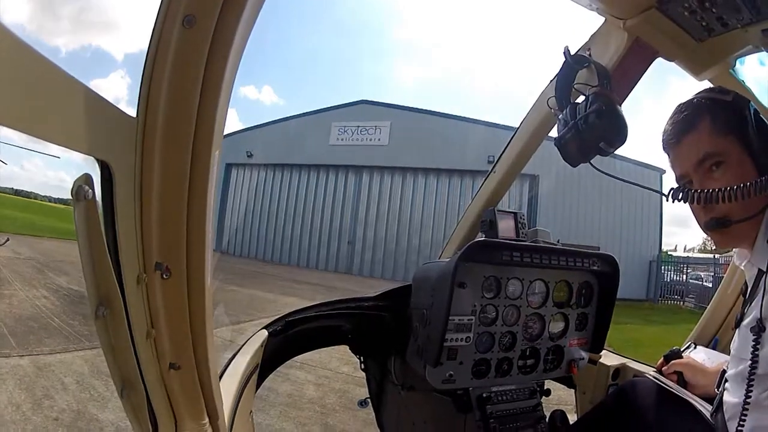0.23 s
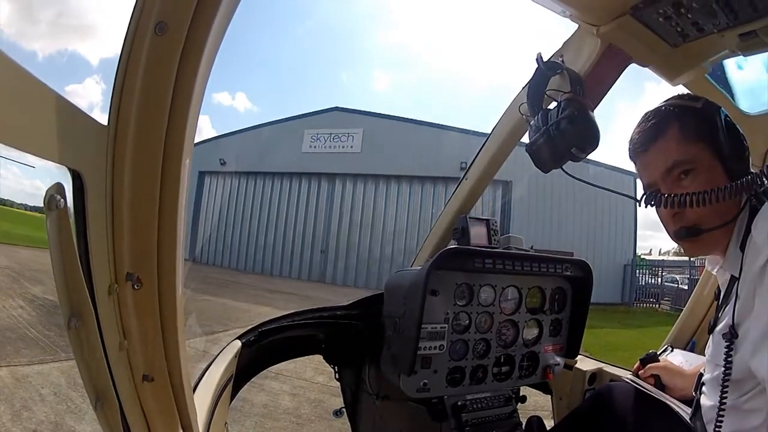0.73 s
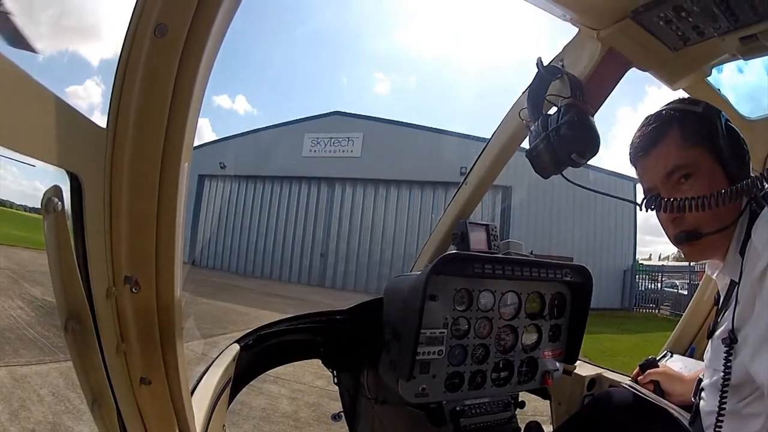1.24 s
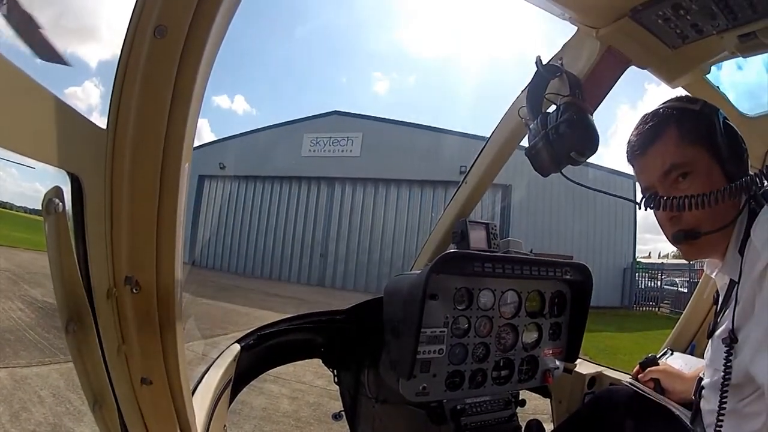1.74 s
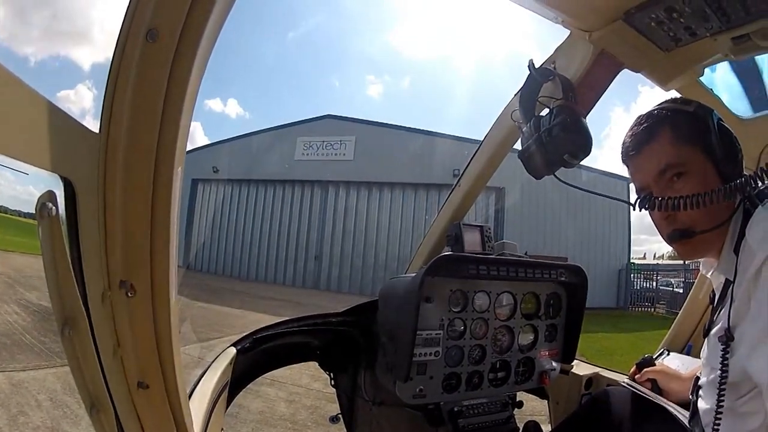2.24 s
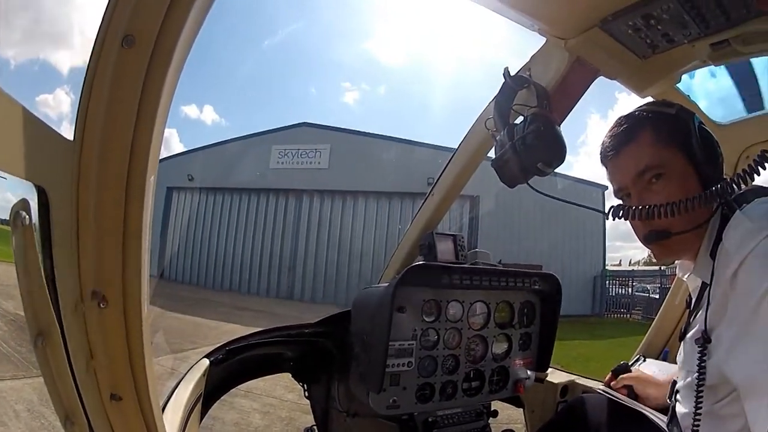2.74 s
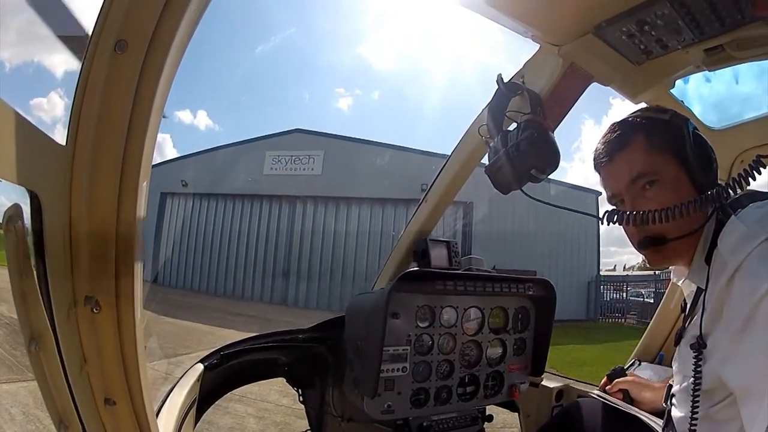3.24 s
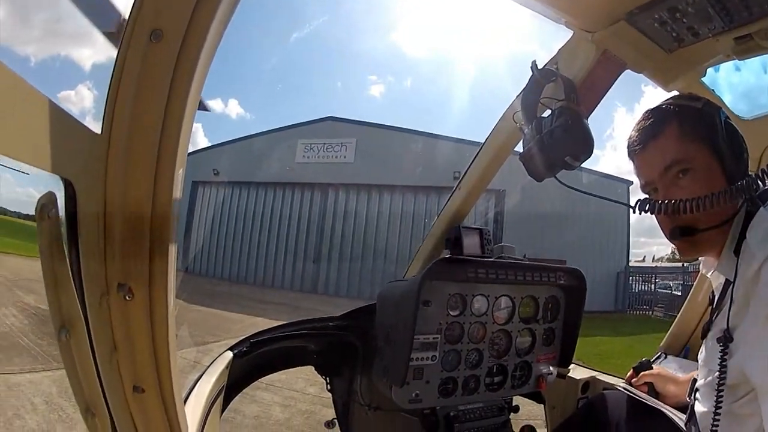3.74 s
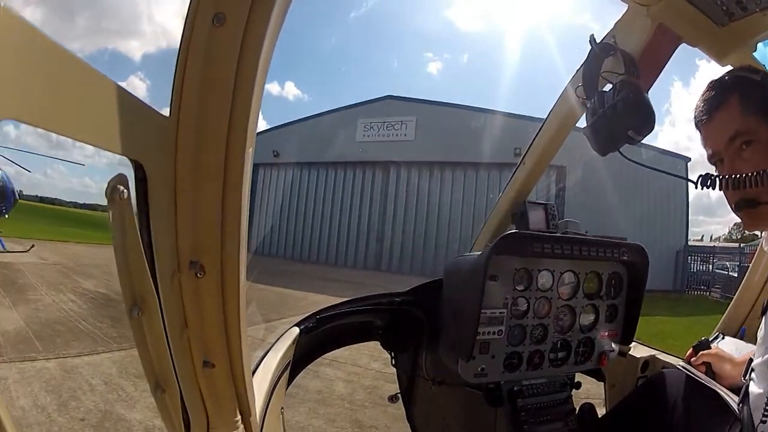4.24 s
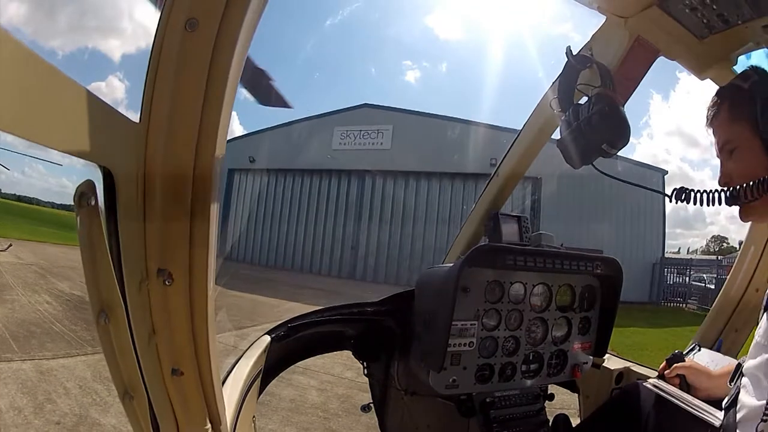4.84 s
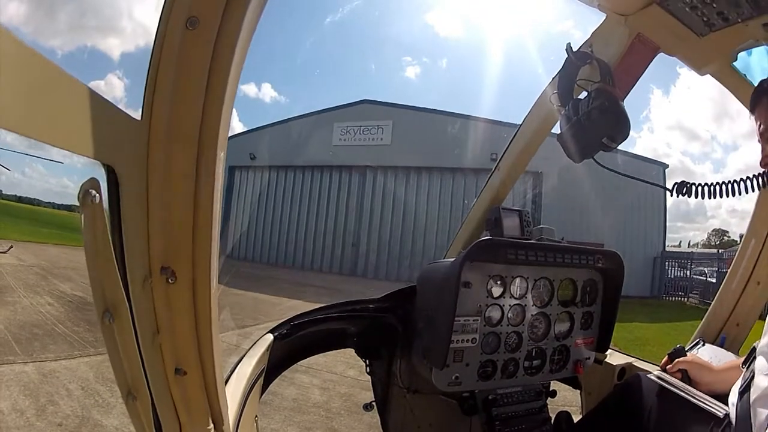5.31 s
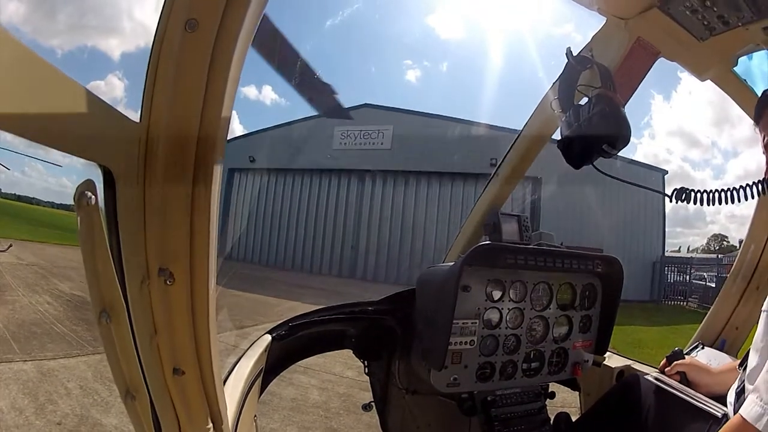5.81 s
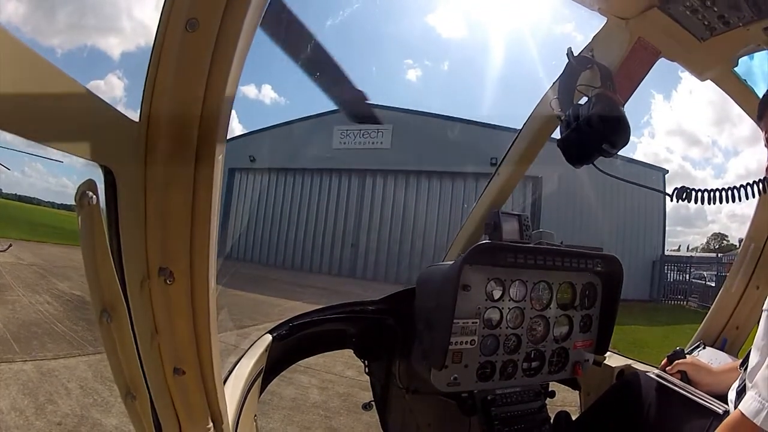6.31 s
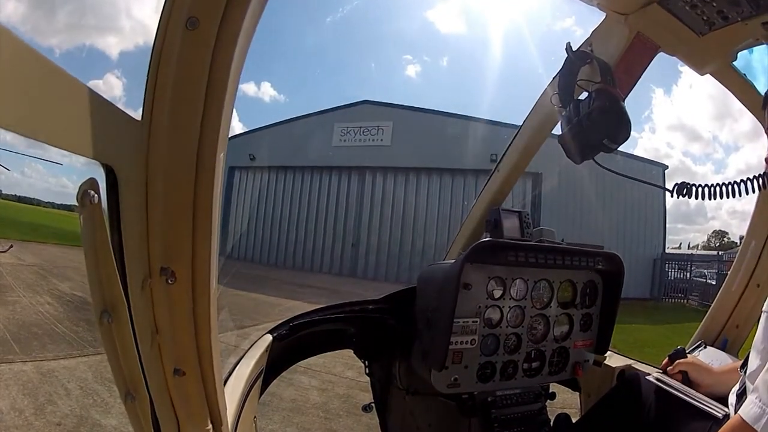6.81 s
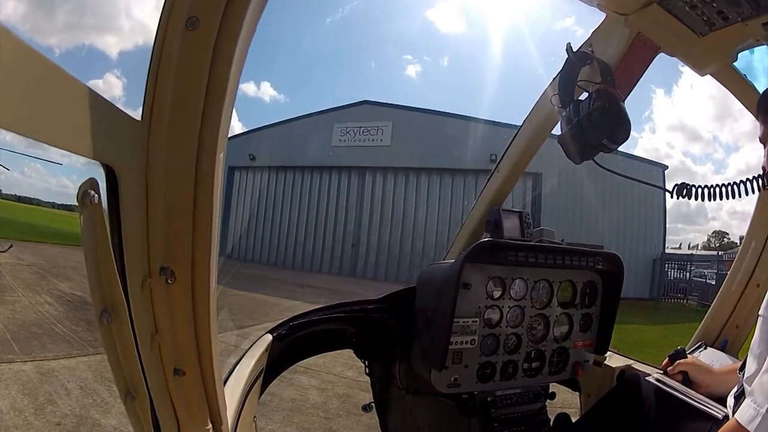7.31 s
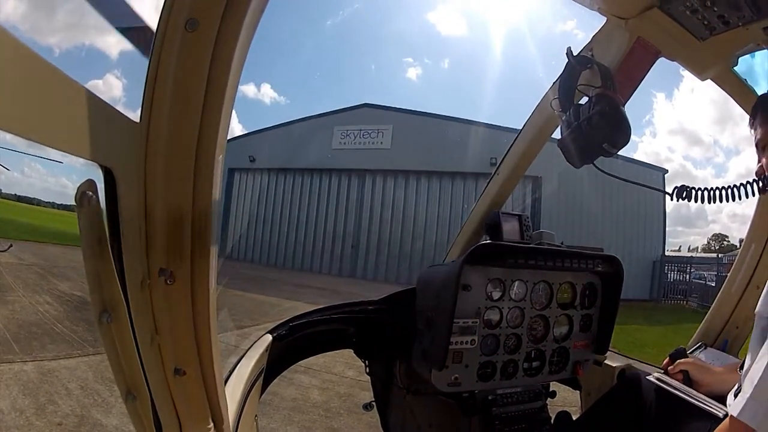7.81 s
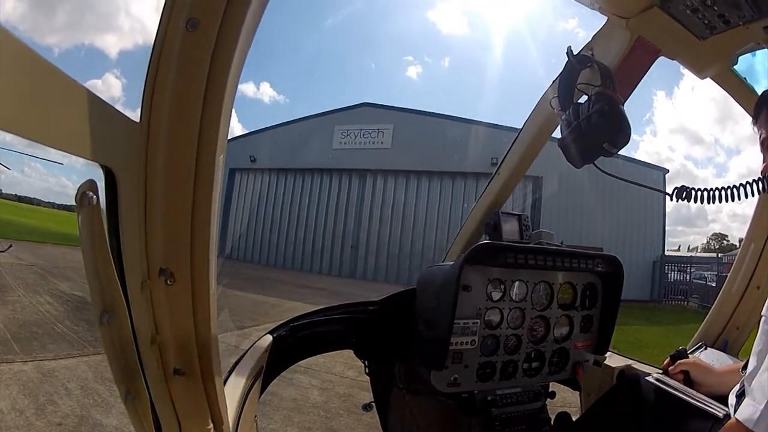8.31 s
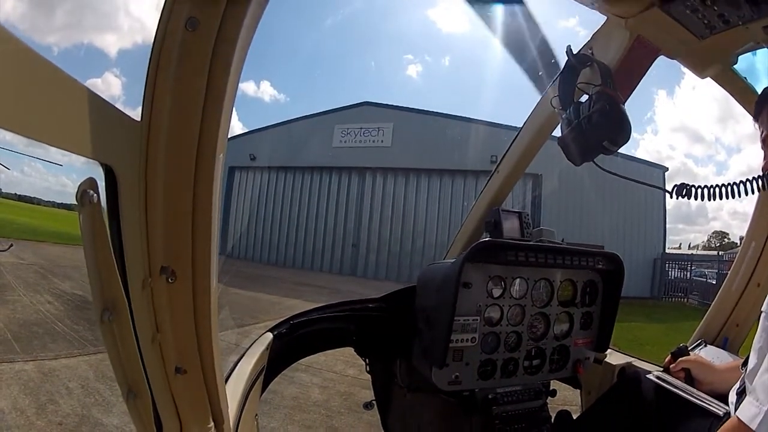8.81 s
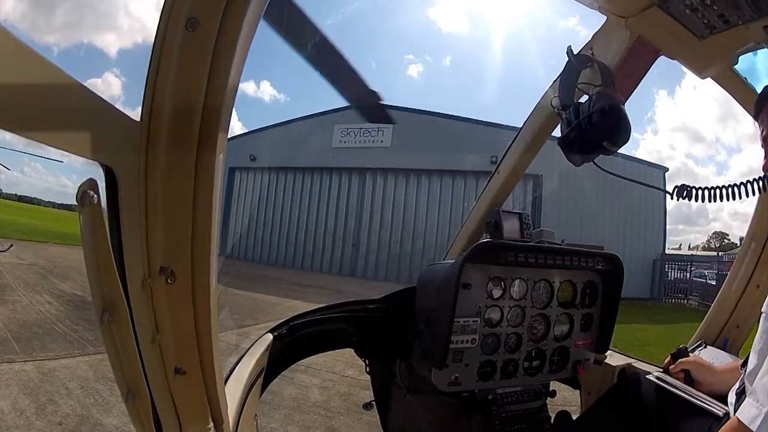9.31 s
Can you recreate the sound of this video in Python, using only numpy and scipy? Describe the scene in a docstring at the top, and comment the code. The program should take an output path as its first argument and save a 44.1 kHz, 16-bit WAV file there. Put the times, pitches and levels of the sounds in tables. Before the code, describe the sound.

A turbine helicopter idles throughout, heard from inside the cabin. A deep, rapidly throbbing rotor rumble and a booming hum lie under the turbine's roar and rush, a chord of fluttering gear tones and a thin high whistle. The first half is loud and gusty, with the door open. At about 2.5 seconds the door gives a sharp double knock. A quick clatter follows around 3.9 seconds, then a thump at 4.4 and a last clack at 4.6 as it shuts. The whole noise drops immediately, leaving a quieter cabin drone with the whine still audible. From about 6.6 to 8.6 seconds the engine picks up a little, its tones rising slightly in pitch and strength, then holding until the end at about 9.5 seconds. The small microphone ducks briefly on the hardest knocks and adds a faint fizz.

```python
"""An idling turbine helicopter from inside: gear tones flutter with the rotor blades over a booming cabin.
Downwash buffets the shell, the tail rotor hums, the turbine roars, rushes and whistles.
The door is knocked about and, with a last clack, shuts out part of the noise; later the engine picks up
a little. A limiter ducks the hardest knocks and a coarse sample clock adds a faint fizz on top."""
import sys
import numpy as np
from scipy import signal
from scipy.fft import rfft, irfft, next_fast_len
from scipy.io import wavfile
from scipy.ndimage import uniform_filter1d, minimum_filter1d, map_coordinates

SR = 44100
rng = np.random.default_rng(int(sys.argv[2]) if len(sys.argv) > 2 else 0)


def unload_wav(signal):
    """Save mono or channel-first audio to the path in sys.argv[1] as 16-bit WAV at rate SR, clipped to [-1, 1]."""
    wavfile.write(
        sys.argv[1],
        SR,
        np.round(np.clip(np.atleast_2d(signal).T, -1, 1) * 32767).astype(np.int16),
    )


N = 421155


def amp(db):
    """Decibels to gain."""
    return 10 ** (np.asarray(db) / 20)


def unit(x):
    """Scaled to rms 1."""
    return x / np.sqrt(np.mean(x ** 2) + 1e-20)


def curves(rows):
    """Automation lanes: one value per sample for each column after the time."""
    times, *columns = np.transpose(rows)
    return [np.interp(np.arange(N) / SR, times, column) for column in columns]


def wobble(rate):
    """A smooth random curve, rate knots a second."""
    at = np.linspace(0, N, 1500)
    knots = rng.standard_normal(int(N * rate / SR) + 4)
    return np.interp(np.arange(N), at, map_coordinates(knots, [at * rate / SR]))


def filtered(x, response):
    """x through an EQ given as gain against frequency."""
    size = next_fast_len(N + SR // 2)
    return irfft(rfft(x, size) * response(np.fft.rfftfreq(size, 1 / SR)), size)[:N]


def noise(colour):
    """Noise with an EQ of (f/Hz, level/dB) points, held near rms 1 over each quarter second."""
    freqs, db = np.transpose(colour)
    eq = lambda hz: amp(np.interp(np.log(hz + 1), np.log(freqs), db, -120, -120))
    x = filtered(rng.standard_normal(N), eq)
    return x / np.sqrt(np.abs(uniform_filter1d(x ** 2, SR // 4)) + 1e-20)


def through_door(shut, open_colour, shut_colour):
    """Noise that crossfades to a new colour as the door shuts."""
    return (1 - shut) * noise(open_colour) + shut * noise(shut_colour)


def tone(hz, turn, smear=0):
    """A sine of rms 1 geared to the engine: hz at idle, its phase pushed by smear radians."""
    return np.sqrt(2) * np.sin(hz * turn + smear + rng.uniform(0, 2 * np.pi))


# base mix, by part: door-open level/dB, door-shut level/dB, lift as the engine picks up/dB
FADERS = {"buffet": (-19, -31.5, .8), "drone": (-21.5, -29, 2.45), "tail rotor": (-24, -44, 7.7),
          "exhaust": (-30, -45, 0.31), "intake": (-36, -53, 0.46), "main gear": (-34.5, -45, 3.6),
          "whistle": (-53, -66, 10.8), "high gear": (-59, -64, 1.6), "half order": (-44.5, -59, 1),
          "shaft": (-44, -58.5, -3)}
# swells and dips as gusts and the cabin's standing waves shift: part, peak t/s, half-length/s, gain/dB
RIDES = [("buffet", 1, 0.68, 3), ("buffet", 4.1, 0.23, -1.3), ("buffet", 5.7, 0.67, 3.4),
         ("drone", 0.28, 0.27, 4.6), ("drone", 4.07, 0.56, 2.7), ("drone", 4.7, 0.054, -12),
         ("main gear", 0.14, 0.22, 4.1), ("main gear", 4.6, 0.35, 3.17), ("tail rotor", 0.63, .25, 6),
         ("tail rotor", 4.29, 0.25, 10.9), ("shaft", 3.22, 0.94, 7.5), ("shaft", 6.9, 1, 6.3),
         ("whistle", 3.05, 0.58, 6.3), ("whistle", 4.25, 0.36, 7), ("whistle", 7, 0.54, -5),
         ("whistle", 7.36, .09, 7), ("whistle", 7.53, .07, -12), ("whistle", 8.07, 0.11, -14),
         ("half order", 0.63, 0.27, 2.9), ("half order", 4.3, 0.25, -13), ("half order", 7.275, 0.9, 7.2),
         ("high gear", 0, 0.68, 5.8), ("high gear", 7.67, 0.63, 7.2)]

def level(part, shut, revs):
    """Level of one part in dB: the door cuts it, engine speed shifts it, swells ride on top."""
    open_db, shut_db, rev_db = FADERS[part]
    t = np.arange(N) / SR
    swell_db = sum(db * np.exp(-((t - peak) / length) ** 2)
                   for name, peak, length, db in RIDES if name == part)
    return open_db + shut * (shut_db - open_db) + rev_db * revs ** 2 + swell_db


BLADE_HZ = 12.35  # blade passes at idle

def flutter(turn, blade, twice, drift):
    """Tremolo from a load that comes once and twice per blade pass, never quite evenly."""
    return 1 + blade * tone(BLADE_HZ, turn) + twice * tone(2 * BLADE_HZ, turn) + drift * wobble(35)


MESH_HZ, SHAFT_HZ, HIGH_GEAR_HZ, WHISTLE_HZ = 1234.6, 608.5, 3607.2, 4749  # at idle

def whine(part, hz, turn, shut, revs):
    """The thin, wavering tone of a fast-spinning part: turbine or high gear."""
    wavering = tone(hz, turn, smear=0.11 * wobble(8))
    return amp(level(part, shut, revs)) * wavering * flutter(turn, blade=0.046, twice=0.041, drift=0.1)


# lesser gear and shaft tones: idle f/Hz, door-open level/dB, door-shut level/dB, flutter depth/0-1
GEAR_TONES = [(235.7, -43, -55.5, 0.37), (292, -37, -52.5, 0.2), (662, -56.5, -69, 0.3),
              (941, -51.5, -60.5, 0.33), (1206, -49.5, -59.5, 0.1), (1624, -66, -74, .1),
              (1728, -56, -71, 0), (1874, -57.5, -69, 0), (2368, -52, -69, 0.26), (3075, -59, -70.5, 0.78),
              (4205, -67, -81, .25)]

def gearbox(turn, shut, revs):
    """Meshing teeth and shafts sing a chord that flutters under the load of the blades."""
    gain = lambda part: amp(level(part, shut, revs))
    mesh = unit(tone(MESH_HZ, turn) * flutter(turn, blade=0.11, twice=0.086, drift=0.077))
    half_order = tone(HIGH_GEAR_HZ / 2, turn) * flutter(turn, blade=0.2, twice=0.34, drift=0.085)
    shaft = tone(SHAFT_HZ, turn, smear=0.32 * wobble(13))
    shaft *= flutter(turn, blade=0.1, twice=0.1, drift=0.34)
    out = gain("main gear") * mesh + gain("half order") * half_order + gain("shaft") * shaft
    out += whine("high gear", HIGH_GEAR_HZ, turn, shut, revs)
    for hz, open_db, shut_db, depth in GEAR_TONES:
        db = open_db + shut * (shut_db - open_db) + wobble(1.93)
        partial = tone(hz, turn, smear=0.34 * wobble(4))
        out += amp(db) * partial * flutter(turn, blade=depth / 2, twice=depth, drift=depth)
    return out


# push of the downwash on the cabin: t/s, level/dB
WASH = [(0, 4.5), (.5, 1), (1.15, 2.5), (1.35, -2.5), (2.4, 1), (3.5, -2.5), (3.9, 5), (4.2, 0.5), (5.2, 0),
        (6.7, -1.5), (9.55, 0)]

def downwash(lumps_db):
    """Strength of the rotor's downwash in dB; the air arrives in lumps."""
    return curves(WASH)[0] + lumps_db * wobble(rate=9)


# rumble of the shell, door open and shut: f/Hz, level/dB
RUMBLE_OPEN = [(5, -51), (12, -5.5), (20, -6), (32, -19), (44, -11.5), (51, 0.5), (60, -1), (71, -15.5),
               (80, 0.5), (87, -9.5), (102, -20), (120, -18), (150, -14.5), (260, -41)]
RUMBLE_SHUT = [(5, -46), (12, -16), (20, -40), (33, -22), (44, -5), (53, 0), (59, 2.5), (71, -14.5),
               (80, -8), (87, -23), (102, -13), (120, -17.5), (150, -38), (260, -69)]

def buffet(shut, revs):
    """Downwash beats on the shell: the low end of the scene."""
    db = level("buffet", shut, revs) + downwash(lumps_db=1.55)
    return amp(db) * through_door(shut, RUMBLE_OPEN, RUMBLE_SHUT)


HUM_OPEN_HZ, HUM_SHUT_HZ, HUM_WANDER_HZ = 186.8, 195.6, 4.04  # the strongest cabin tone
# boom of the cabin: f/Hz, level/dB
BOOM = [(90, -58), (130, -8.5), (152, -13), (163, 1.5), (173, -3), (188, 2), (203, 0), (215, -4.5),
        (240, -13), (270, -31), (400, -49)]

def cabin_drone(shut, revs):
    """The cabin booms under the downwash, with a wandering hum that rises as the door shuts."""
    db = level("drone", shut, revs) + downwash(lumps_db=1.16)
    hum_hz = HUM_OPEN_HZ + shut * (HUM_SHUT_HZ - HUM_OPEN_HZ) + HUM_WANDER_HZ * wobble(3)
    phase = 2 * np.pi * np.cumsum(hum_hz) / SR + 0.86 * wobble(12)
    hum = unit(np.sin(phase) * amp(3.55 * wobble(15)))
    return amp(db) * (amp(-3) * noise(BOOM) + amp(-5.5) * hum)


TAIL_ROTOR_HZ = 95.3  # at idle

def tail_rotor(turn, shut, revs):
    """A low hum, smeared by moving air."""
    hum = tone(TAIL_ROTOR_HZ, turn, smear=0.5 * wobble(4))
    return amp(level("tail rotor", shut, revs) + 1.5 * wobble(8)) * hum


# exhaust roar and intake rush, door open and shut: f/Hz, level/dB
EXHAUST_OPEN = [(150, -7), (240, 9.5), (320, 9.5), (380, 5), (480, -1), (610, 1.5), (710, -2), (820, -9.5),
                (945, -1.5), (1060, -7), (1200, 0.5), (1400, -14.5), (1800, -28)]
EXHAUST_SHUT = [(150, -28), (240, 5), (320, 5.5), (380, 2.5), (480, -1.5), (610, 1), (710, -4.5),
                (820, -12.5), (950, -2), (1040, -11.5), (1240, 3), (1400, -11), (1800, -54)]
INTAKE_OPEN = [(900, -36), (1450, -12), (1680, -8), (1830, 5.5), (2080, -0.5), (2200, -4), (2420, -4),
               (2700, -8), (3050, -8.5), (3300, -16), (3600, -11), (4100, -20), (4900, -18), (6000, -31)]
INTAKE_SHUT = [(900, -36), (1450, -8.5), (1680, -2.5), (1830, 6.5), (2080, 1), (2200, -3.5), (2420, -2.5),
               (2700, -5.5), (3050, -5), (3300, -14), (3600, -4), (4100, -16.5), (4900, -15), (6000, -26)]

def turbine(turn, shut, revs):
    """The exhaust roars unevenly, the blades stir the intake's rush, and a whistle sits on top."""
    roar = amp(level("exhaust", shut, revs)) * through_door(shut, EXHAUST_OPEN, EXHAUST_SHUT)
    roar *= amp(1.2 * wobble(14))
    rush = amp(level("intake", shut, revs)) * through_door(shut, INTAKE_OPEN, INTAKE_SHUT)
    rush *= flutter(turn, blade=0.03, twice=0.041, drift=0.05)
    return roar + rush + whine("whistle", WHISTLE_HZ, turn, shut, revs)


CONTACT_RISE_S = 0.0002  # padded parts meet softly
# ring of the frame and latch, thud of the panel: f/Hz, level/dB, t60/s
LATCH_MODES = [(540, 1, 0.033), (1141.4, 6.5, 0.022), (2230, 9, 0.018), (2480, 8.5, 0.019),
               (3680, 4, 0.026)]
PANEL_MODES = [(189, 1.5, 0.049), (386, -5, 0.018)]
# door hits: t/s, scrape level/dB, thud level/dB, scrape length/s, ring level/dB, scrape low-pass f/Hz
DOOR_HITS = [(0.14, -25.5, -20, .006, -45, 6050), (2.471, -6, -6, 0.0066, -2.5, 5970),
             (2.5, -6, -4, 0.008, -14.5, 3500), (3.8606, -11, -13, .0025, -25, 3600),
             (3.8774, -5.5, -7, 0.0031, -24, 3900), (3.9039, -9, -16, 0.0037, -27, 4200),
             (3.9675, -18, -17, .0034, -36, 3600), (3.996, -33.5, -32, 0.026, -38, 4000),
             (4.432, -19, -4, 0.0044, -30, 5500), (4.488, -31.5, -21, .0073, -47, 6000),
             (4.578, -33, -15, 0.0067, -45, 6030), (4.618, -8.5, -13, .002, -32, 2400),
             (4.6375, -22.5, -25, 0.0047, -44, 3300), (4.822, -41, -19, 0.001, -70, 7000),
             (8.904, -40, -51, .003, -65, 9000)]

def door_knocks():
    """Each contact scrapes briefly, thumps the panel and rings the latch."""
    out = np.zeros(N + SR)
    t = np.arange(SR // 5) / SR
    struck = lambda modes: sum(amp(db - 60 * t / t60) * np.sin(2 * np.pi * hz * t)
                               for hz, db, t60 in modes)
    ring, thud = struck(LATCH_MODES), struck(PANEL_MODES)
    grit = contact_noise()
    for at, scrape_db, thud_db, length, ring_db, cutoff_hz in DOOR_HITS:
        start = round(at * SR)
        span = slice(start, start + len(t))
        attack = 1 - np.exp(-t / CONTACT_RISE_S)
        release = np.exp(-(t / length) ** 2) * (t < 2 * length)  # the contact lets go
        padding = signal.butter(2, cutoff_hz, fs=SR)  # padded contacts are duller
        scrape = signal.lfilter(*padding, grit[span] * attack * release)
        scrape = unit(scrape) * np.sqrt(length / t[-1])
        out[span] += amp(scrape_db) * scrape + amp(ring_db) * ring + amp(thud_db) * thud
    return out[:N]


# colour of a dry contact: f/Hz, level/dB
GRIT = [(200, 6), (600, -13), (820, -7), (1250, -1.5), (2200, -1), (3000, -4), (3700, -7), (4200, -14),
        (4900, -12), (6000, -23)]

def contact_noise():
    """The grit of door parts scraping together."""
    return noise(GRIT)


# engine speed, as the pitch of the main gear mesh: t/s, f/Hz
MESH_PITCH = [(6.6, 1234.6), (7.1, 1241.5), (8.1, 1261), (8.6, 1264.8), (9.55, 1263.8)]
# the door is pulled to, eases back, then slams: t/s, share shut/0-1
DOOR_TRAVEL = [(3.85, 0.01), (4.1, 0.12), (4.62, 0), (4.66, 1)]

def scene():
    """Every shaft follows one engine speed; the door lets in more or less of each part."""
    mesh_hz, = curves(MESH_PITCH)
    turn = 2 * np.pi * np.cumsum(mesh_hz / mesh_hz[0]) / SR  # phase of one hertz at idle
    revs = (mesh_hz - mesh_hz[0]) / (mesh_hz[-1] - mesh_hz[0])  # 0 at idle, 1 once picked up
    shut, = curves(DOOR_TRAVEL)
    gears = gearbox(turn, shut, revs)
    blade_throb = 1 + 0.14 * tone(BLADE_HZ, turn)
    cabin = (buffet(shut, revs) + cabin_drone(shut, revs)) * blade_throb
    return (gears + cabin + tail_rotor(turn, shut, revs) + turbine(turn, shut, revs) + door_knocks())[None]


def limiter(x, ceiling_db, attack_s, hold_s, release_db_per_s):
    """A sharp peak ducks everything; the gain holds, then climbs back."""
    over_db = np.maximum(20 * np.log10(np.abs(x) + 1e-9) - ceiling_db, 0)
    size = int(hold_s * SR) | 1
    held_db = -minimum_filter1d(-over_db, size, origin=size // 2)
    recovery_db = release_db_per_s * np.arange(N) / SR
    duck_db = np.maximum.accumulate(held_db + recovery_db) - recovery_db
    pole = np.exp(-1 / (attack_s * SR))
    return x * amp(-signal.lfilter([1 - pole], [1, -pole], duck_db))


def sample_and_hold(x, clock_hz):
    """A slow clock mirrors the sound around itself, weaker by the ratio of the frequencies."""
    x = filtered(x, lambda hz: np.interp(hz, [5500, 6500], [1, 0]))  # anti-alias roll-off
    slope = filtered(x, lambda hz: 1j * hz)
    mirrored = slope * 2 * np.cos(2 * np.pi * clock_hz * np.arange(N) / SR)
    return x + filtered(mirrored, lambda hz: 1 / (1j * np.maximum(hz, clock_hz / 2)))


def record(dry):
    """A small camera's sound chain: limiter, clipping, sample-and-hold and a steep high cut."""
    x = limiter(dry[0], ceiling_db=-0.5, attack_s=0.0069, hold_s=0.038, release_db_per_s=162)
    x = sample_and_hold(np.clip(x, -1, 1), clock_hz=12000)
    return filtered(x, lambda hz: np.interp(hz, [15080, 15480], [1, 0]))[None]


dry = scene()
out = record(dry)
unload_wav(out)
```